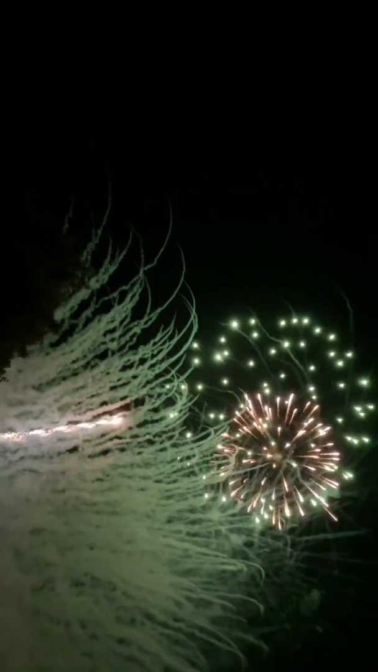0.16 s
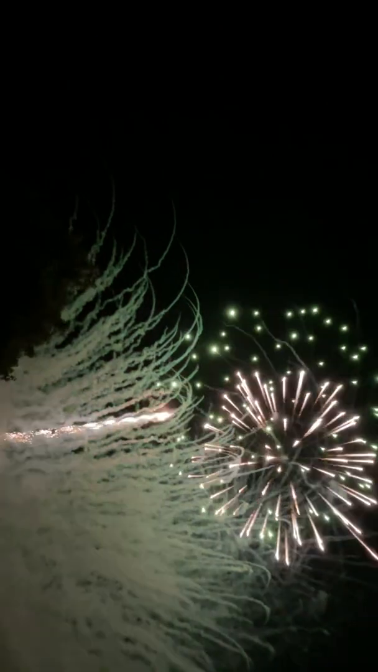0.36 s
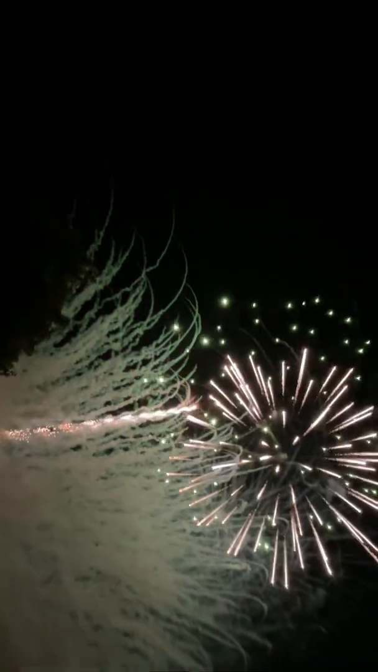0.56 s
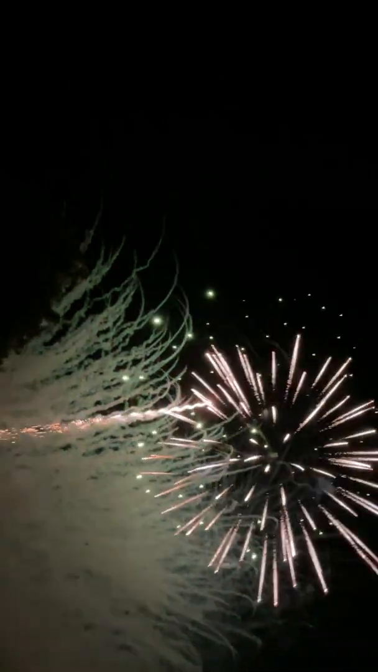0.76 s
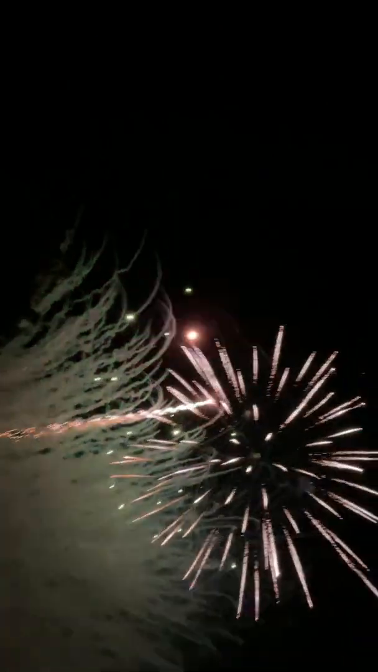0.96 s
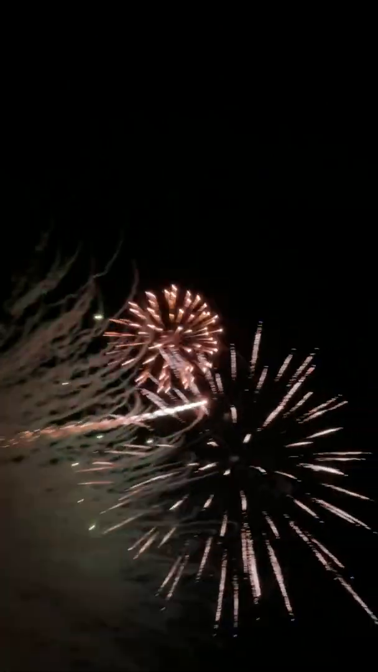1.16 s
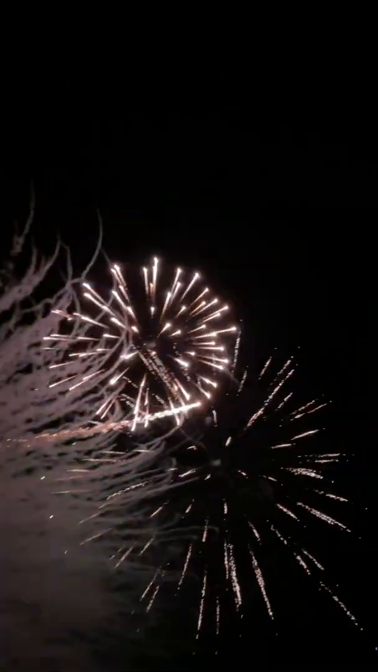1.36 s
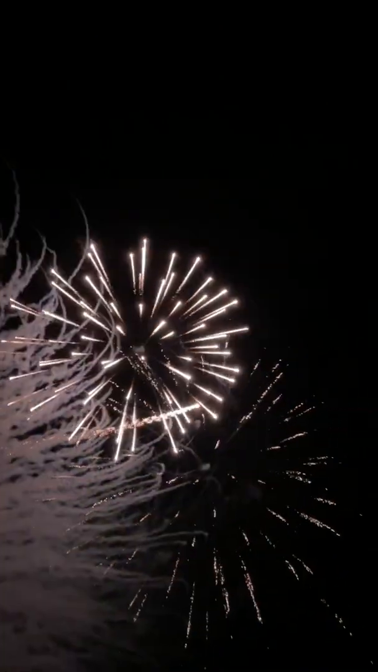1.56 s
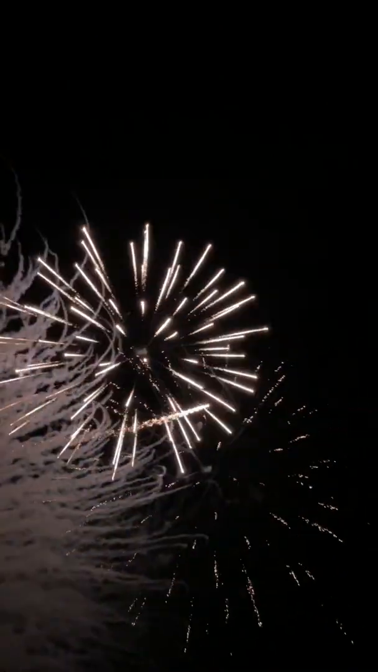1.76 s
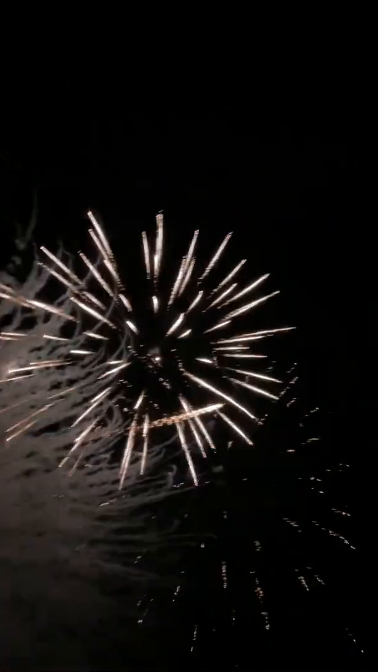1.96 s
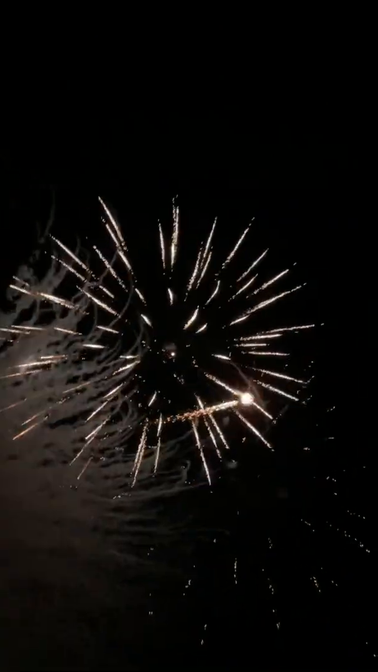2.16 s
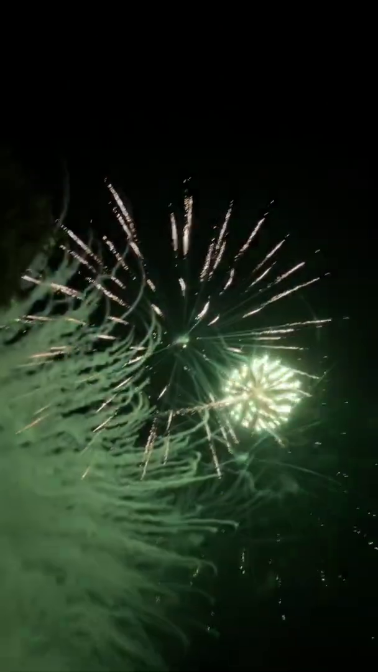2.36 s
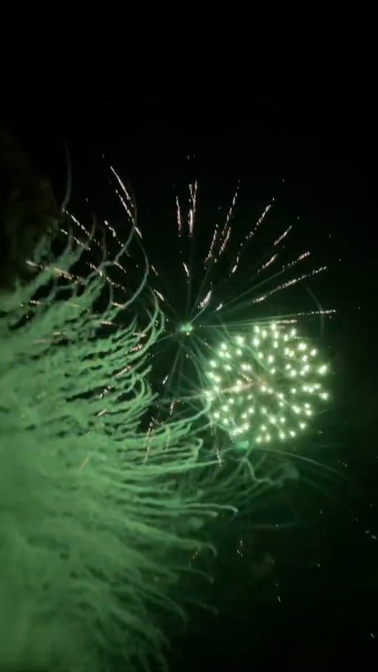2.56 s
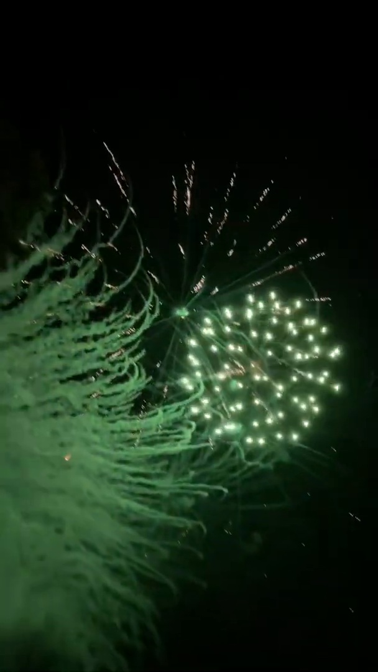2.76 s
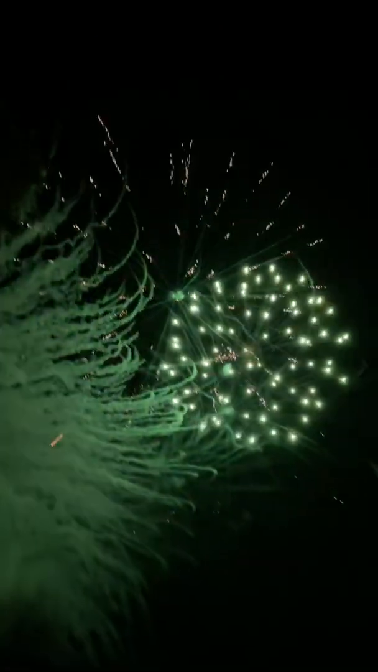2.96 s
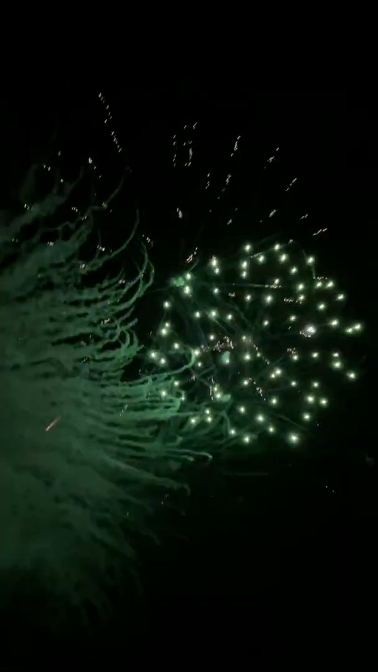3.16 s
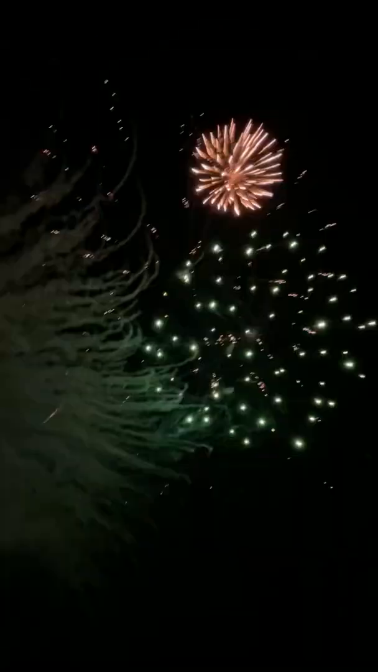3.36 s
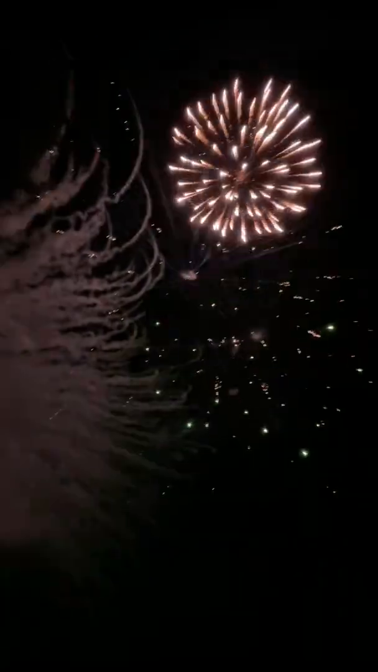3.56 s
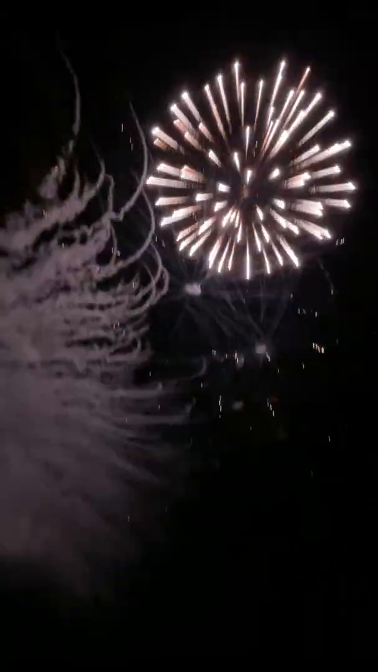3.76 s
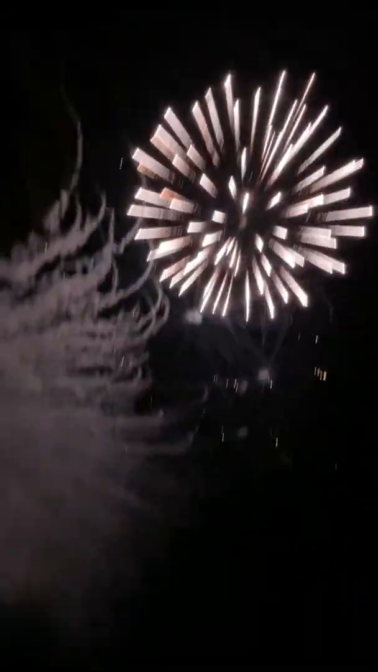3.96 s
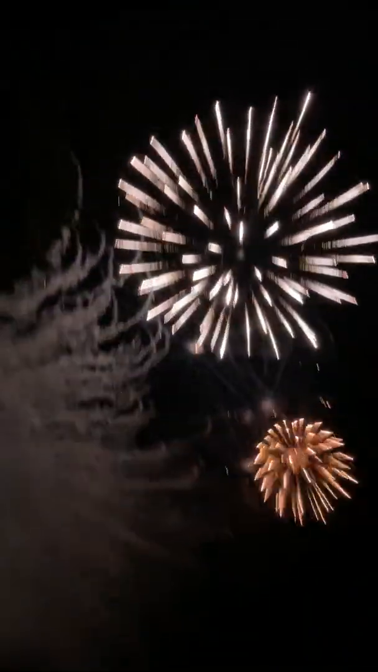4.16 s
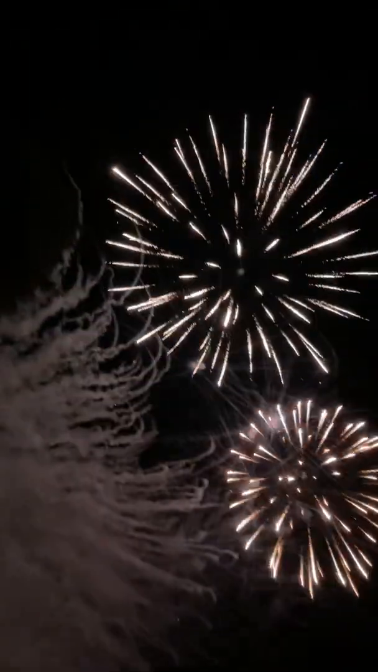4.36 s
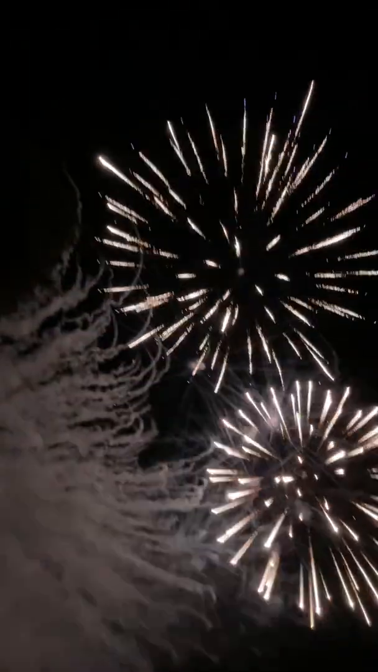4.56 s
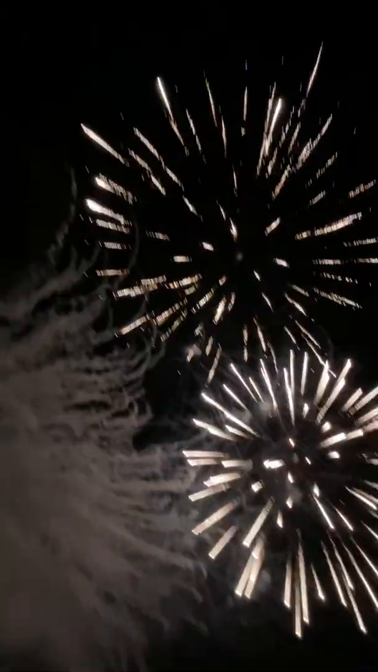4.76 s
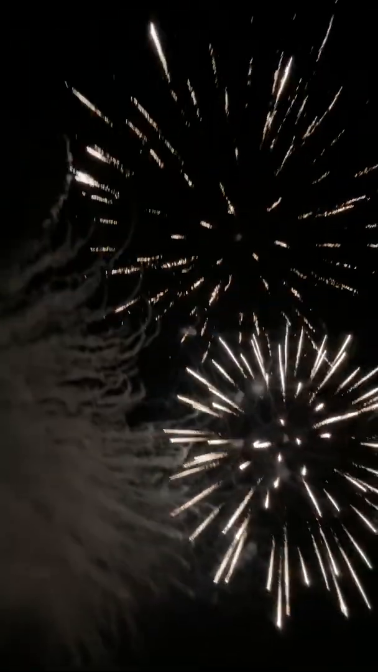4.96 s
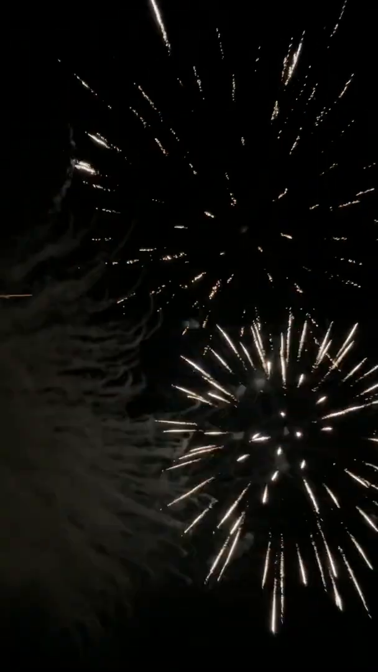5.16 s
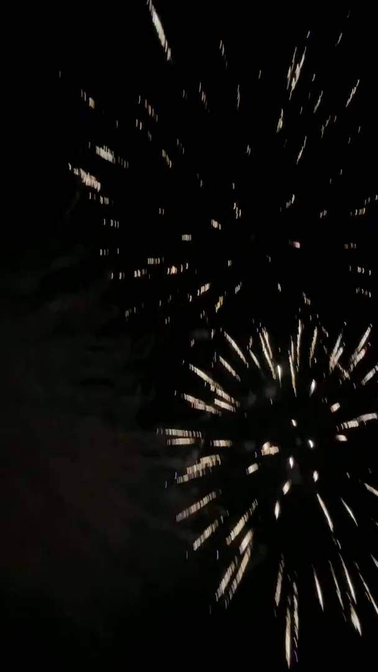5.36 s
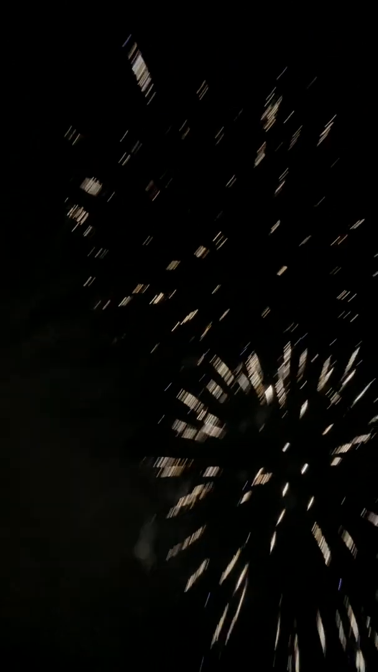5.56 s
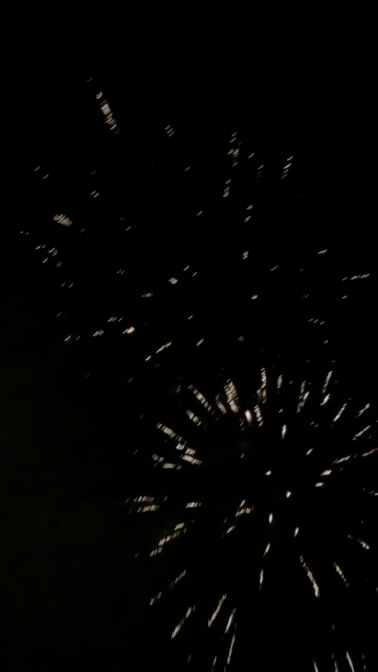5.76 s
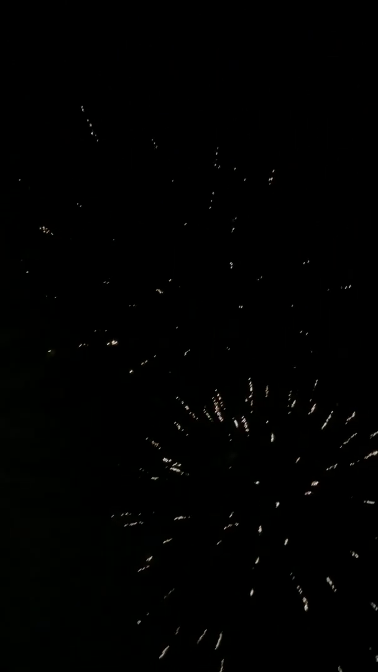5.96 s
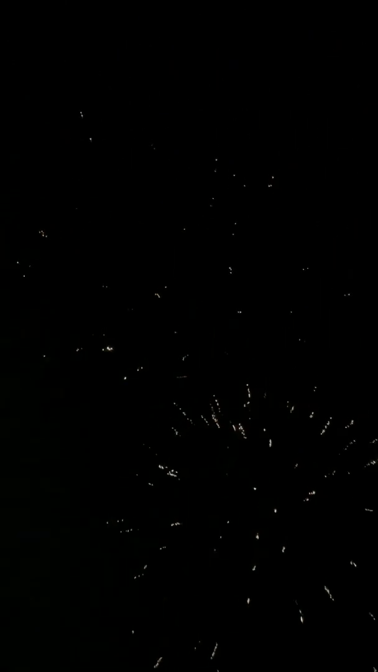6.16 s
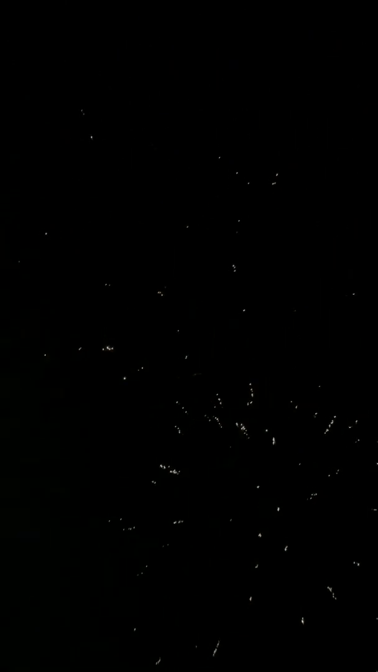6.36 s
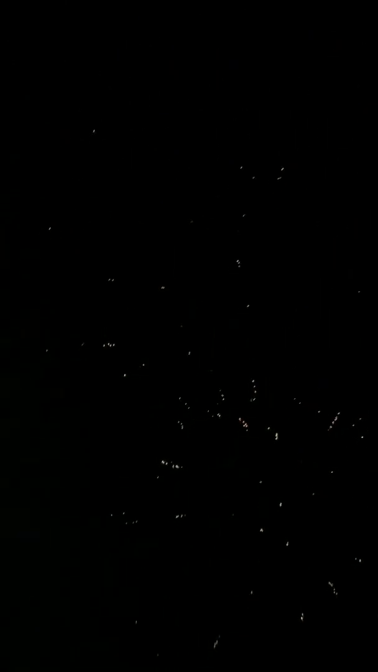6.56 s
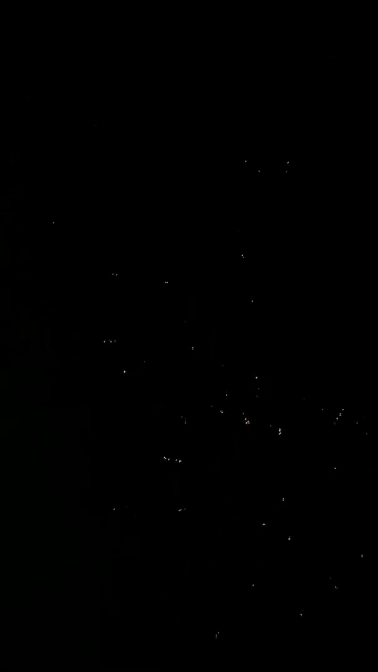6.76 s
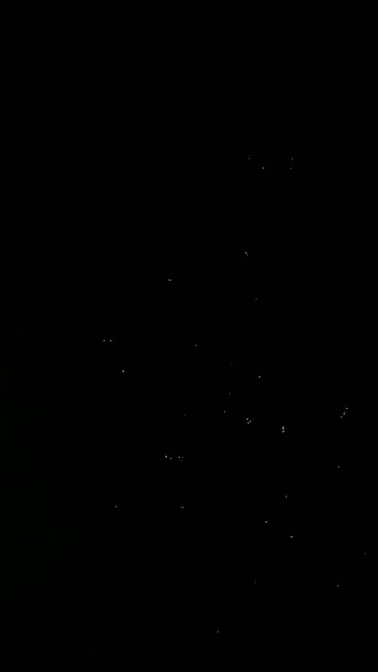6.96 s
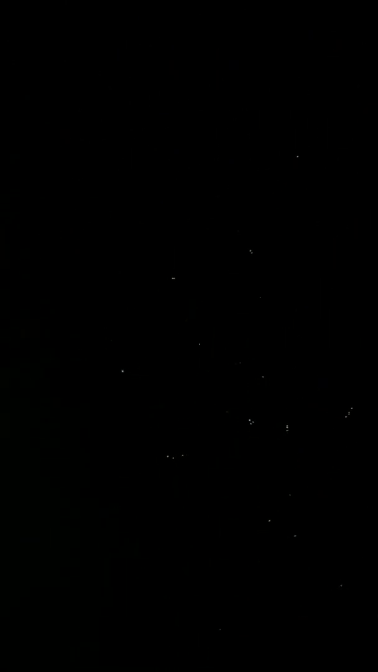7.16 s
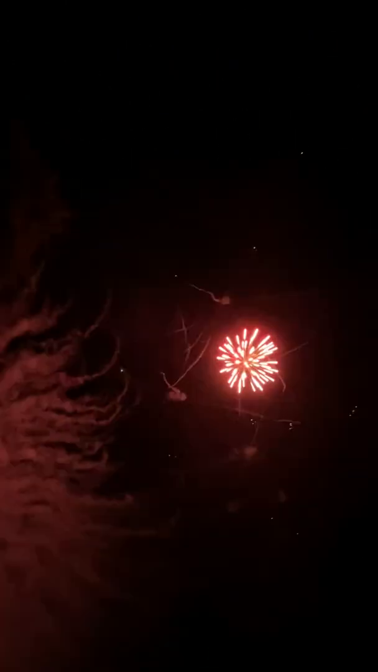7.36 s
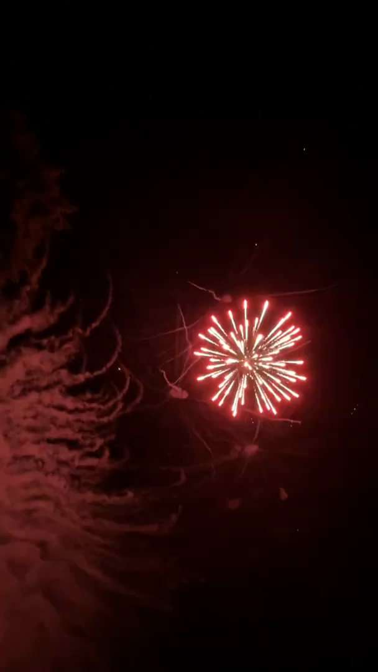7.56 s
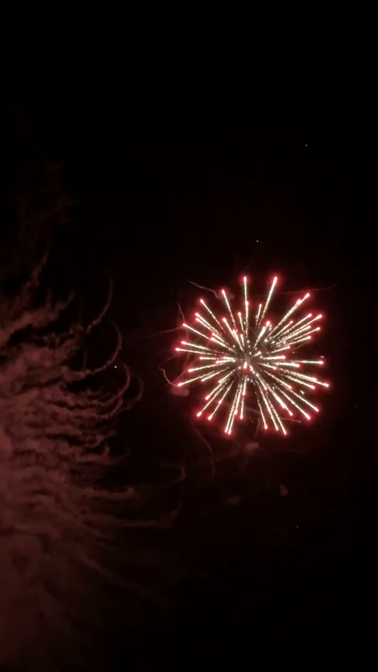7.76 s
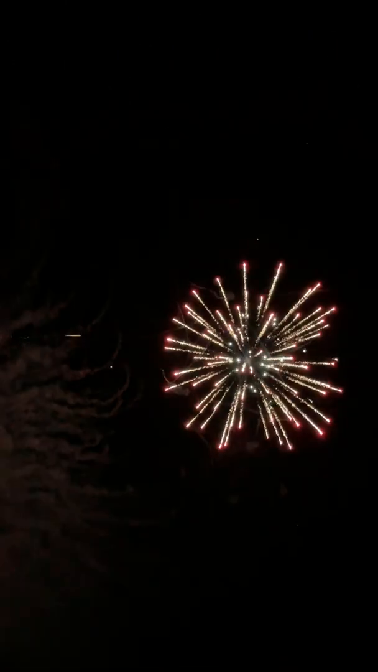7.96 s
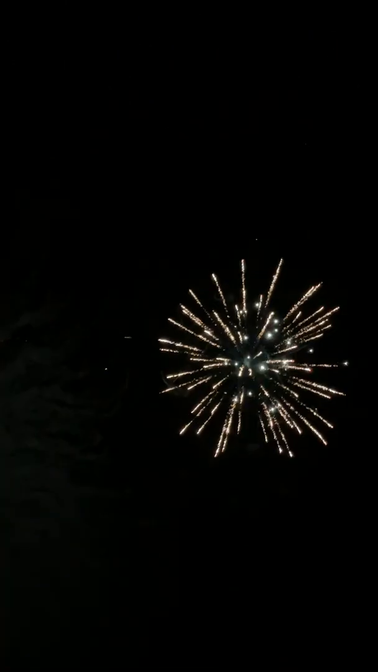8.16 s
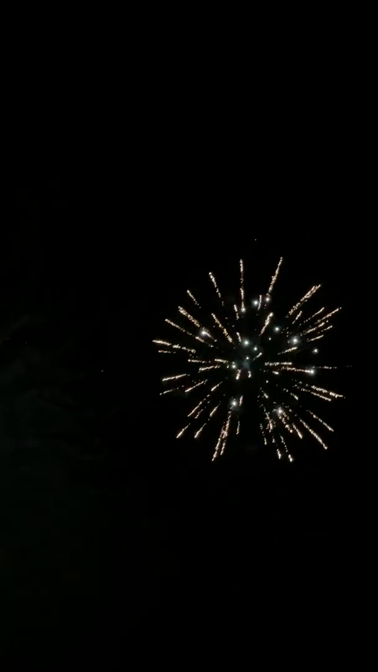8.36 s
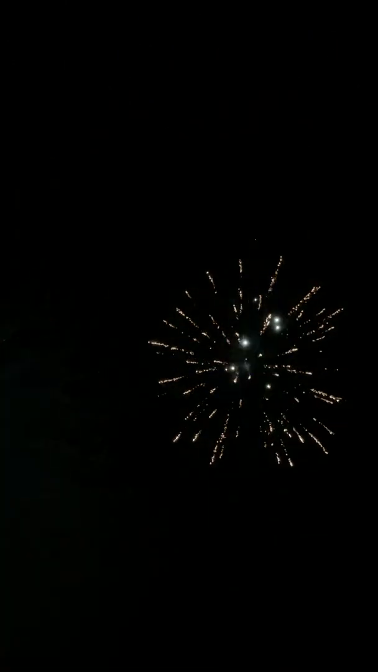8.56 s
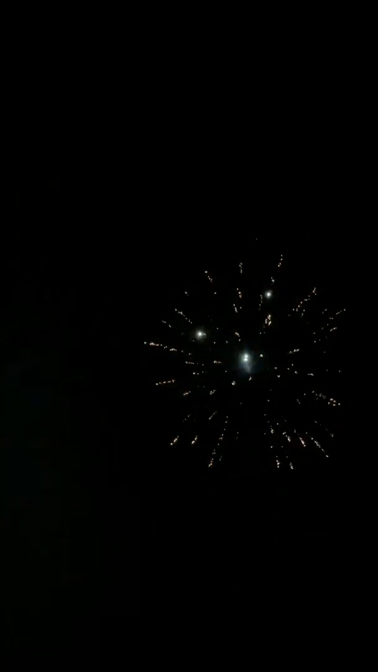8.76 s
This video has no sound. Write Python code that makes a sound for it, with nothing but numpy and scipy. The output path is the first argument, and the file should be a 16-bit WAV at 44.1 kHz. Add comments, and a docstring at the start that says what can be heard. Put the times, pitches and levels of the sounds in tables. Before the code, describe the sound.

Fireworks overhead: a string of hard, bassy bangs and snaps with echoing rumble, a pause of distant wash, and a final thinner burst.

```python
"""Fireworks over a quiet street

Firework shells at night in the open: lift charges thump from the mortars as torn noise and a slow push of air,
and shells burst overhead as sharp pulses with a ground bounce, among small snaps and flecks of filtered noise.
Echoes roll back as decaying diffuse noise, with a far lingering wash, over a quiet street floor; two thin
harmonic yelps fall in pitch at the start. A handheld two-port recorder smears each bang into a falling chirp."""
import sys
import numpy as np
from scipy import signal
from scipy.fft import rfft, irfft, next_fast_len
from scipy.io import wavfile
from scipy.ndimage import uniform_filter1d

SR = 44100
rng = np.random.default_rng(int(sys.argv[2]) if len(sys.argv) > 2 else 0)


def persist_wave(psi):
    """Save psi, clipped to +-1, as 16-bit WAV."""
    counts = np.round(np.clip(psi, -1, 1) * 32767).astype(np.int16)
    wavfile.write(sys.argv[1], SR, np.atleast_2d(counts).T)


def ratio_of_db(decibels):
    """Turn decibels (scalar or array-like) into linear amplitude factors; 0 dB maps to 1."""
    return 10 ** (np.asarray(decibels, float) / 20)


N = 388962
T = np.arange(N) / SR

# Slowly changing background levels, echo wash and traffic roar: start_s, wash_db, passing_roar_db
BACKGROUND_LEVELS = [(0, -50.5, -62.5), (5.4, -51.5, -63), (6.2, -48, -49), (6.801, -56, -48),
                     (7.5, -53.5, -50.5), (8.82, -55, -56.5)]
RUMBLE_DB = -50
# Relative spectra of town rumble, of the bangs' lingering wash and of traffic roar: frequency_hz, density_db
RUMBLE_SPECTRUM = [(24, -31.5), (40, -6.5), (48, -15), (66, 1.5), (77, -9.5), (97, -15), (199, -14),
                   (345, -29.5), (500, -21.5), (650, -53), (1100, -120)]
WASH_SPECTRUM = [(150, -28), (250, -10), (450, -20), (650, -13.5), (1000, -14.5), (1900, -18.5),
                 (2350, -10.5), (2900, -28), (5000, -42.5), (8000, -58), (10000, -100)]
ROAR_SPECTRUM = [(500, -49), (700, -14.5), (830, 0), (1050, -5), (1350, -1.5), (1700, -8), (2000, -15.5),
                 (3000, -27), (5000, -51.5)]
# Left-right correlation of diffuse sound: frequency_hz, correlation
CORRELATION = [(60, 0.99), (150, 1), (380, 0.46), (950, -0.57), (2380, 0.066), (5980, 0.016), (15000, 0.69)]

# Decay time by 60 dB, before each roll's stretch: frequency_hz, decay_s
DECAY_TIMES = [(50, 3.6), (100, 1.29), (250, 1.59), (500, 1.77), (2000, 1.37), (5000, 0.86), (10000, 0.57)]
# Relative spectra of the echo roll after bursts and after lift charges, as finally heard,
# with a hole near 11-12 kHz that is not the echo's own: frequency_hz, density_db
BURST_ROLL_SPECTRUM = [(35, -24), (70, -5.5), (140, -2.5), (320, -14), (440, -20), (1000, -16.5),
                       (1900, -13), (2330, -6.5), (3300, -22.5), (10200, -32), (11000, -72), (12800, -68),
                       (14500, -46.5), (16500, -71)]
LIFT_ROLL_SPECTRUM = [(21, -41), (35, -4.5), (91, -1), (141, -3.5), (242, -19.5), (394, -25.5),
                      (1190, -17.5), (1500, -19.5), (2330, -9), (3260, -24), (8450, -31), (10100, -33.5),
                      (10900, -94.5), (14900, -48), (16500, -95.5)]
# Roll level against the blast; its lift around 450 Hz, more where bass is poor (dB per dB of bass)
BURST_ROLL_DB, BURST_BODY_DB, BODY_PER_BASS = -63, 3.5, -0.23
# The roll follows crack and thump together (dB per dB)
LIFT_ROLL_DB, LIFT_ROLL_GROWS = -34.5, 0.42
# Its bass follows the thump (dB per dB); its dip around 450 Hz
LIFT_BASS_DB, LIFT_BASS_GROWS, LIFT_BODY_DB = -11.5, 0.18, -4

# Distant walls that answer every shot: delay_s, loss_db, pitch_hz
BURST_WALL_ECHOES = [(0.153, -61, 181), (0.36, -64.5, 122.2)]
LIFT_WALL_ECHOES = [(0.095, -72.5, 88.2), (.435, -71.5, 75.1)]
WALL_PER_BASS = 0.6  # shells rich in bass answer louder (dB per dB)

# Yelps: start_s, level_db (fundamental, before the waver)
YELP_CALLS = [(-.04, -37), (.43, -38)]
# Yelps, right port over left: frequency_hz, gain_db
YELP_PORT_RATIO = [(1100, -8), (1500, -6), (2300, 9), (2800, 5), (3500, 0)]
# Duration; the pitch starts a drop above its end value and sags towards it with a time constant
YELP_S, YELP_END_HZ, YELP_DROP_HZ, YELP_SAG_S = 0.23, 1085, 410, 0.11
YELP_PEAK_S, YELP_FADE_DB_PER_S2 = 0.15, 481  # loudest moment, fade to both sides of it
YELP_WAVER_DB, YELP_WAVER_S = 3, 0.015  # rms depth and smoothing time of the level waver

# Small snaps; those with highest_hz below 3000 are brief narrow flecks of noise near 2 kHz,
# chance grain in the echo roll: start_s, level_db (rms before the envelope), highest_hz
SNAP_EVENTS = [(0.7177, -23, 12000), (0.74, -25.5, 10000), (.8140, -29.5, 3500), (1.0800, -42, 2600),
               (1.1260, -35.5, 2420), (1.1821, -43, 4000), (1.7407, -29, 11850), (1.817, -35, 5000),
               (2.3940, -39.5, 2620), (2.9502, -48, 11050), (4.979, -38, 14000)]
SNAP_LOW_HZ = 1500
# Relative spectrum of cracks and snaps: frequency_hz, density_db
CRACK_SPECTRUM = [(300, -35), (600, -4), (900, -5), (1600, -2.5), (3000, -8.5), (6000, -18), (9000, -14),
                  (13000, -35), (17000, -25.5)]

# Lift charges: start_s, crack_db (before the swell), crack_width_ms, thump_db, echo_wait_s
LIFT_SHOTS = [(.7660, -17.5, 3.34, 46, 0.09), (1.7610, -12, 2.26, 47.5, 0.046),
              (4.9970, -19, 3.8, 35, .105), (7.6200, -17.5, 1.27, 29, 0.083)]
THUMP_MS, THUMP_GROWS = 0.5, 0.24  # length at 0 dB; a bigger charge pushes longer (dB of length per dB)
# A deeper note rings after each thump
GROUND_HZ, GROUND_WIDTH_HZ, GROUND_LATE_S, GROUND_SHARE = 65, 41, 0.012, 0.46

# Shell bursts: start_s, blast_db, ground_bounce_ms, echo_wait_s, roll_bass_db; the first precedes the start
BURST_SHOTS = [(-.205, 42.5, 9.5, .1, 1.5), (0.2731, 40.5, 10.5, 0.16, -0.5), (1.29, 39, 8.3, 0.11, 0.5),
               (2.5073, 36.5, 9.7, 0.087, -1.5), (3.606, 38.5, 9.5, .1, -1), (4.4330, 39, 9.5, 0.071, 3),
               (7.527, 37, 11.5, 0.079, -10.5)]
# Blast wave at the left port: frequency_hz, gain_db
BLAST_SPECTRUM = [(30, -15.5), (50, 1.5), (90, 0), (200, 0.5), (400, -5), (800, -14), (1600, -23),
                  (3200, -32), (6400, -46.5), (12000, -55.5), (17000, -65)]
# Brightening per octave, more for shells poor in bass; how much the ground returns
TILT_DB, TILT_PER_BASS, BOUNCE_SHARE = 0.5, -0.073, 0.4

# Right port over left: frequency_hz, gain_db
PORT_RATIO = [(300, 0.5), (500, -1), (800, 1.5), (1100, 3.5), (1400, 4.5), (1700, 10), (2000, 16.5),
              (2350, 15), (2700, 6), (3200, 7.5), (4000, -4), (8000, -0.5), (15000, -2)]
# Overall colour of the whole sound, with a treble dip near 12 kHz: frequency_hz, gain_db
OVERALL_COLOUR = [(25, -25.5), (45, -6.5), (60, -1), (10300, 0), (11500, -14.5), (12800, -16.5),
                  (13800, 11), (16300, -5), (17000, -55)]


def unit(x):
    """Root-mean-square normalisation to one."""
    return x / np.sqrt(np.mean(x ** 2) + 1e-20)


def along(points, hz):
    """Linear interpolation of (frequency_hz, value) points on a logarithmic frequency axis."""
    f, v = np.transpose(points)
    return np.interp(np.log(hz + 1), np.log(f + 1), v)


def filtered(x, response):
    """Linear filtering: the spectrum of x times a complex frequency response."""
    m = next_fast_len(x.shape[-1] + SR // 4)
    spectrum = rfft(x, m) * response(np.fft.rfftfreq(m, 1 / SR))
    return irfft(spectrum, m)[..., :x.shape[-1]]


def late(hz, s):
    """Pure delay of s seconds: a phase lag proportional to frequency."""
    return np.exp(-2j * np.pi * hz * s)


def resonance(hz, centre_hz, width_hz):
    """Damped oscillator: unit gain at its centre, falling away over its bandwidth."""
    return 1j * hz * width_hz / (centre_hz ** 2 - hz ** 2 + 1j * hz * width_hz)


def add(track, s, sound, lead=0):
    """Superposition: mixes a sound in, starting lead samples before s."""
    i = max(round(s * SR) - lead, 0)
    track[..., i:i + sound.shape[-1]] += sound[..., :N - i]


def diffuse(spectrum, field, patchy_db):
    """Diffuse field: stereo noise of set left-right correlation, shaped in frequency and time."""
    hz, t, z = signal.stft(rng.standard_normal((2, N)), SR, nperseg=512, noverlap=384)

    def blotches(bins, frames):
        noise = rng.standard_normal(z.shape[1:])
        return unit(uniform_filter1d(uniform_filter1d(noise, size=bins, axis=0), size=frames, axis=1))

    # random patches, and a flutter that is faster and wider in frequency
    patches = blotches(5, 10) + 1.2 * blotches(40, 3)
    shaped = z * ratio_of_db(patchy_db * patches) * field(hz[:, None], t)
    pair = signal.istft(shaped, SR, nperseg=512, noverlap=384)[1][:, :N]
    mean_power = np.mean(ratio_of_db(along(spectrum, np.fft.rfftfreq(8192, 1 / SR))) ** 2)

    def mid_side(f):
        angle = np.arccos(np.clip(along(CORRELATION, f), -1, 1)) / 2
        return ratio_of_db(along(spectrum, f)) * np.array([np.cos(angle), np.sin(angle)]) / np.sqrt(mean_power)

    mid, side = filtered(pair, mid_side)
    return np.array([mid + side, mid - side])


def background():
    """Incoherent sums add in power: town rumble, swelling traffic roar, far lingering wash of the bangs' echoes."""
    s, wash_db, roar_db = np.transpose(BACKGROUND_LEVELS)
    steady = lambda hz, t: 1
    rumble = ratio_of_db(RUMBLE_DB) * diffuse(RUMBLE_SPECTRUM, steady, patchy_db=0.82)
    wash = ratio_of_db(np.interp(T, s, wash_db)) * diffuse(WASH_SPECTRUM, steady, patchy_db=0.82)
    roar = ratio_of_db(np.interp(T, s, roar_db)) * diffuse(ROAR_SPECTRUM, steady, patchy_db=0.82)
    return rumble + wash + roar


def echo_roll(shots, spectrum, gap_db, sudden, stretch, far_db):
    """Reverberant decay: few echoes first, most after a wait; rates vary with pitch, the farthest linger."""
    def field(hz, t):
        power = 0
        for s, wait_s, db, bass_db, body_db in shots:
            age = np.maximum(t - s, 0)
            fall_db = -60 * age / (stretch * along(DECAY_TIMES, hz))
            decay_power = ratio_of_db(fall_db) ** 2 + ratio_of_db(far_db + fall_db / 1.825) ** 2
            filling = ratio_of_db(gap_db * np.exp(-(age / wait_s) ** sudden))
            bass = bass_db / (1 + (hz / 200) ** 4)
            body = body_db * np.exp(-((hz - 450) / 300) ** 2)
            power = power + (t > s + 0.004) * decay_power * (filling * ratio_of_db(db + bass + body)) ** 2
        return np.sqrt(power)
    return diffuse(spectrum, field, patchy_db=1.7)


def burst_roll():
    """Reverberation driven by the blasts: its level follows each shell."""
    shots = [(s, wait_s, db + BURST_ROLL_DB, bass_db, BURST_BODY_DB + BODY_PER_BASS * bass_db)
             for s, db, _, wait_s, bass_db in BURST_SHOTS]
    return echo_roll(shots, BURST_ROLL_SPECTRUM, gap_db=-5, sudden=9.5, stretch=1.318, far_db=-10.0)


def lift_roll():
    """Reverberation driven by the lift charges: its bass follows each thump."""
    shots = [(s, wait_s, LIFT_ROLL_DB + LIFT_ROLL_GROWS * (crack_db + thump_db),
              LIFT_BASS_DB + LIFT_BASS_GROWS * thump_db, LIFT_BODY_DB)
             for s, crack_db, _, thump_db, wait_s in LIFT_SHOTS]
    return echo_roll(shots, LIFT_ROLL_SPECTRUM, gap_db=-5.5, sudden=12.0, stretch=0.92, far_db=-8.5)


def thuds():
    """Selective reflection: a wall sends back only the low part of a bang, a cycle or two."""
    out, t = np.zeros(N), np.arange(-1024, 1024) / SR
    shots = [(s, db + WALL_PER_BASS * bass_db, BURST_WALL_ECHOES) for s, db, *_, bass_db in BURST_SHOTS]
    shots += [(s, thump_db, LIFT_WALL_ECHOES) for s, _, _, thump_db, _ in LIFT_SHOTS]
    for s, db, walls in shots:
        for delay_s, loss_db, hz in walls:
            if s + delay_s > 0:
                wavelet = np.exp(-(t * hz / 0.97) ** 2) * np.cos(2 * np.pi * hz * t)
                add(out, s + delay_s, ratio_of_db(db + loss_db) * wavelet, lead=1024)
    return out


def yelps():
    """Harmonic series on a gliding fundamental: thin falling calls with two weak overtones."""
    out = np.zeros(N)
    for s, db in YELP_CALLS:
        age = np.maximum(T - s, 0)
        pitch_hz = YELP_END_HZ + YELP_DROP_HZ * np.exp(-age / YELP_SAG_S)
        phase = 2 * np.pi * np.cumsum(pitch_hz) / SR
        gate = np.clip(np.minimum(age, YELP_S - age) / 0.013, 0, 1)
        waver = unit(uniform_filter1d(rng.standard_normal(N), round(YELP_WAVER_S * SR)))
        fade_db = YELP_FADE_DB_PER_S2 * (age - YELP_PEAK_S) ** 2
        level = ratio_of_db(db + YELP_WAVER_DB * waver - fade_db)
        tone = np.sin(phase) + ratio_of_db(-8) * np.sin(2 * phase) + ratio_of_db(-18) * np.sin(3 * phase)
        out += np.sqrt(2) * gate * level * tone
    return out


def snaps():
    """Band-limited noise under a two-rate decay: dry cracks with a brief fizz, and narrow flecks near 2 kHz."""
    out, t = np.zeros(N), np.arange(2048) / SR
    fall = (1 - np.exp(-t / 0.001)) * (ratio_of_db(-60 * t / 0.025) + 0.5 * ratio_of_db(-60 * t / 0.09))
    for s, db, high_hz in SNAP_EVENTS:
        def colour(f):
            band = 1 / (1 + (SNAP_LOW_HZ / (f + 1)) ** 10) / (1 + (f / high_hz) ** 10)
            return ratio_of_db(along(CRACK_SPECTRUM, f)) * band
        noise = unit(filtered(rng.standard_normal(len(t)), colour))
        add(out, s, ratio_of_db(db) * fall * noise)
    return out


def lifts():
    """Jet noise and volume displacement: gas tears out of the tube, and a slow push of air thumps."""
    out, pulse, t = np.zeros(N), np.zeros(8192), np.arange(2048) / SR
    pulse[256] = 1
    for s, crack_db, width_ms, thump_db, _ in LIFT_SHOTS:
        widths = (t - 0.0105) / width_ms * 1000
        swell = np.exp(-widths ** 2) + 0.29 * np.exp(np.minimum(widths / 2.5, -widths / 6))
        tear = unit(filtered(rng.standard_normal(len(t)), lambda f: ratio_of_db(along(CRACK_SPECTRUM, f))))
        add(out, s - 0.006, ratio_of_db(crack_db) * swell * tear)
        length_s = THUMP_MS * ratio_of_db(THUMP_GROWS * thump_db) / 1000

        def thump(f):
            wt = 2j * np.pi * f * length_s
            low_cut = 1 / (1 + 45 / (1j * f + 1e-3)) ** 2
            push = 3 * late(f, 0.002) * wt / (1 + wt + 0.34 * wt ** 2) ** 4 * low_cut
            deep = GROUND_SHARE * late(f, GROUND_LATE_S) * resonance(f, GROUND_HZ, GROUND_WIDTH_HZ)
            return push * (1 + deep)
        add(out, s, ratio_of_db(thump_db) * filtered(pulse, thump), lead=256)
    return out


def bursts():
    """Blast wave and images: one sharp pulse, again off the ground and duller, then faintly off things nearby."""
    out, pulse = np.zeros(N), np.zeros(8192)
    pulse[1024] = 1
    for s, db, bounce_ms, _, bass_db in BURST_SHOTS[1:]:  # the first is heard only by its echoes
        near_s = 0.00032 + rng.exponential(0.0071, size=12)
        near = rng.standard_normal(size=12) * np.exp(-near_s / 0.015)

        def blast(f):
            tilt_db = (TILT_DB + TILT_PER_BASS * bass_db) * np.log2((f + 30) / 200)
            direct = ratio_of_db(db + along(BLAST_SPECTRUM, f) + tilt_db)
            # soft soil swallows a middle band
            soil = (1 - 0.2 * np.exp(-((f - 1000) / 600) ** 2)) / (1 + 1j * f / 4000)
            ground = BOUNCE_SHARE * late(f, bounce_ms / 1000) * soil
            hollow = 1.03 * late(f, 0.008) * resonance(f, 100, 30)  # a low hollow nearby rings on
            # small things return mostly treble
            scatter = 0.25 * (f / (f + 3000)) * (late(f[:, None], near_s) @ near)
            return direct * (1 + ground + hollow + scatter)
        add(out, s, filtered(pulse, blast), lead=1024)
    return out


def right_port(f):
    """Diffraction: bass comes late round the body, the resonant band early, the top almost with the left."""
    bass, top = 1 / (1 + (f / 1100) ** 4), 1 / (1 + (4000 / (f + 1)) ** 6)
    middle = 1 - bass - top
    paths = 0.85 * bass * late(f, 0.00036) + 0.71 * middle * late(f, -0.000789) + top * late(f, 0.00002)
    return ratio_of_db(along(PORT_RATIO, f)) * paths


def yelp_right_port(f):
    """Phase opposition: below 1800 Hz, thus for the lowest tone, the right port has the opposite sign."""
    return np.sign(f - 1800) * ratio_of_db(along(YELP_PORT_RATIO, f))


def shared(f):
    """Power conservation: sound from all around divides between the ports as their gains do."""
    right = ratio_of_db(along(PORT_RATIO, f))
    return np.array([np.ones_like(f), right]) * np.sqrt(2 / (1 + right ** 2))


def scene():
    """Superposition of direct sound at both ports with echoes and background from all around."""
    around = background() + burst_roll() + lift_roll()
    calls = yelps()
    direct = thuds() + snaps() + lifts() + bursts()
    left = direct + calls
    right = filtered(direct, right_port) + filtered(calls, yelp_right_port)
    return np.array([left, right]) + filtered(around, shared)


def band_limit(x):
    """A steep low-pass at the top of the band."""
    return signal.sosfilt(signal.butter(12, 16830, fs=SR, output="sos"), x)


def record(dry):
    """Dispersion and saturation: each frequency lags by about one and a half periods; peaks clip softly."""
    def colour_and_delay(f):
        dispersion = np.exp(-2j * np.pi * 1.44 * np.log((f + 12) / 170))
        return ratio_of_db(along(OVERALL_COLOUR, f)) * dispersion
    smeared = filtered(dry, colour_and_delay)
    clipped = smeared / (1 + np.abs(smeared / 1.02) ** 6) ** (1 / 6)
    return band_limit(clipped)


dry = scene()
out = record(dry)
persist_wave(out)
```